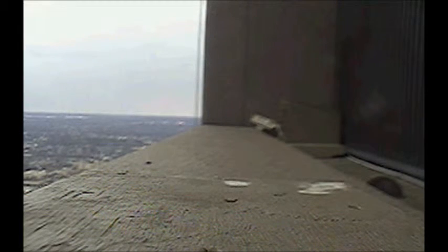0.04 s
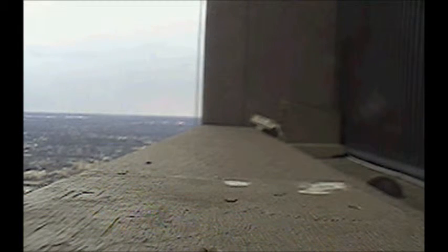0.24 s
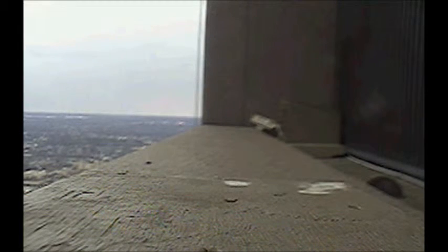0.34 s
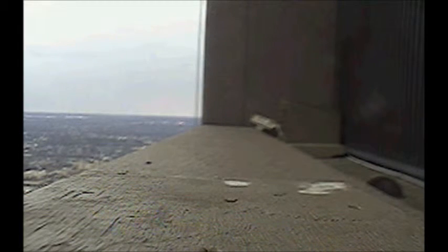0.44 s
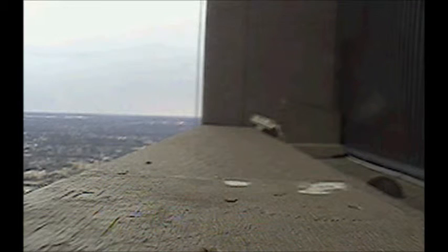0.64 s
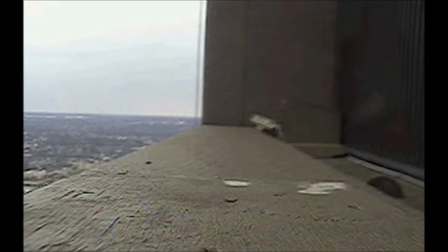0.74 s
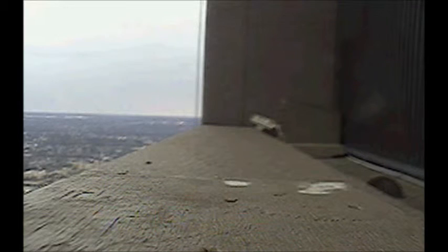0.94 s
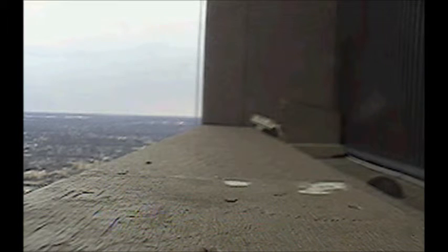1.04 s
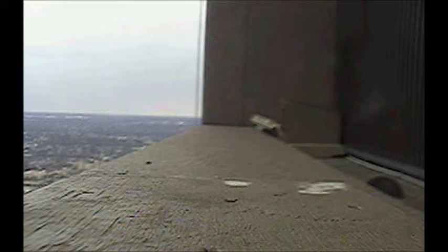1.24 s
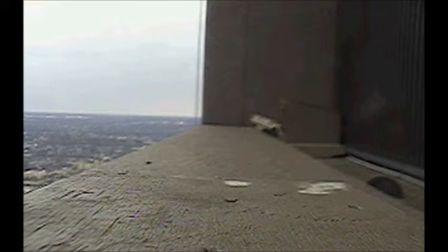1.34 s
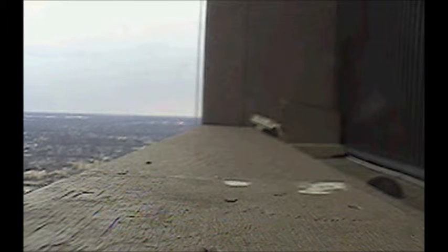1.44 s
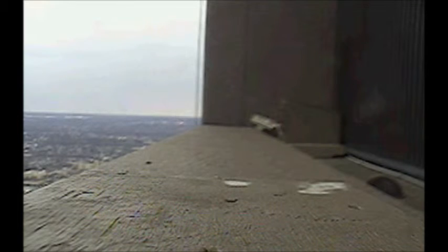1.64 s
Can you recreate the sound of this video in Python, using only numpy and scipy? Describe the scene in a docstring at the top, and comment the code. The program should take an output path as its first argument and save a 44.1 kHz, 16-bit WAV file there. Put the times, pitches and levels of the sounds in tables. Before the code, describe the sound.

A falcon gives three harsh, loud calls close by over low city rumble.

```python
"""Over city rumble and drone, a far falcon yelps. At 0.2 s a near falcon on a stone ledge calls, loud enough
to clip: a rising whistle of the syrinx breaks into a falling, period-doubled rasp. Far yelps follow, then
a second such call at 0.7 s, more yelps and two thin cheeps. At 1.2 s the near bird croaks, slow pulses
ringing its throat, and runs into a short whistle. Two faint cheeps end the scene."""
import sys
import numpy as np
from scipy import signal
from scipy.fft import rfft, irfft, next_fast_len
from scipy.io import wavfile
from scipy.ndimage import map_coordinates

SR = 44100
rng = np.random.default_rng(int(sys.argv[2]) if len(sys.argv) > 2 else 0)


def put_to_file(sound):
    """Save the sound as 16-bit audio at rate SR, in the file named by the first command-line argument."""
    columns = np.atleast_2d(sound).T  # one column per channel
    safe = np.clip(columns, -1, 1)
    whole_steps = np.round(safe * 32767)
    wavfile.write(sys.argv[1], SR, whole_steps.astype(np.int16))


N = 74970
T = np.arange(N) / SR

# Each row: multiple of the whistle's pitch, relative level in dB.
WHISTLE_OVERTONES = [(2, -24), (3, -43)]
# Throat response for the broken voice and for the rasp. Each row: frequency in Hz, gain in dB.
BROKEN_COLOUR = [(500, -3), (950, -20.5), (1300, -11.5), (1750, -9), (2200, -4), (2700, -1), (2980, -1.5),
                 (3170, -10.5), (3550, -9), (4050, -13.5), (4500, -19), (5000, -14.5), (5400, -21.5),
                 (5800, -10.5), (6400, -33), (7800, -25), (12000, -47.5)]
RASP_COLOUR = [(150, -11), (400, -11.5), (900, -2.5), (1200, -5), (1600, -2), (2300, 2.5), (2700, 0),
               (3150, -8), (3550, -1.5), (4400, -15.5), (5000, -17), (8000, -24), (12000, -29)]
WHISTLE_JITTER, BROKEN_JITTER, JITTER_RATE_HZ, FLUTTER_DB = 0.0097, 0.026, 700, 1.97
RASP_PULSE_HZ, RASP_DEPTH = 330.4, 0.52


def syrinx(t, pitch_hz, whistle_db, broken_db, rasp_db):
    """A whistle that grows unsteady as it breaks into a stack on half its pitch, plus pulsing rasp."""
    broken_share = amp(broken_db) / (amp(broken_db) + amp(whistle_db))
    jitter = (WHISTLE_JITTER + BROKEN_JITTER * broken_share) * wobble(JITTER_RATE_HZ, t)
    phase = running_phase(pitch_hz * (1 + jitter))
    overtones = sum(amp(db + 6.6 * wobble(200, t)) * np.sin(k * phase) for k, db in WHISTLE_OVERTONES)
    stack = np.zeros(len(t))
    for k in (1, *range(3, 14)):  # the whistle fills k = 2
        partial_db = along(BROKEN_COLOUR, k * pitch_hz / 2) + 4.28 * wobble(250, t)
        stack += amp(partial_db) * np.sin(k * phase / 2 + rng.uniform(0, 2 * np.pi))
    pulse_hz = RASP_PULSE_HZ * (1 + 0.243 * wobble(200, t))
    pulsing = 1 + RASP_DEPTH * np.cos(running_phase(pulse_hz))
    rasp = unit(resonate(pulsing ** 2 * hiss(t), RASP_COLOUR))
    whistle = np.sqrt(2) * amp(whistle_db + FLUTTER_DB * wobble(300, t)) * (np.sin(phase) + overtones)
    return whistle + amp(broken_db) * stack + amp(rasp_db) * rasp


# Near calls. Each row: time in seconds, pitch in Hz, then whistle, broken voice and rasp levels in dB.
CALL_1 = [(.224, 1964, -26, -48, -29), (.233, 2065, -15, -50.5, -31), (0.248, 2202, -12, -35, -34.5),
          (0.262, 2302, -8.5, -30, -13.5), (.271, 1953, -6, -5.5, -29), (.28, 1753, -10.5, -3.5, -15.5),
          (0.293, 1659, -4.5, -6, -8.5), (0.297, 1683, -24, -19.5, -12), (0.308, 1709, -23, -21.5, -15.5),
          (0.337, 1660, -61, -39, -34)]
CALL_2 = [(0.712, 1997, -30, -56, -37), (0.722, 2110, -12.5, -49, -27.5), (0.736, 2243, -13.5, -31, -26),
          (0.75, 2199, -4.5, -16.5, -20.5), (0.755, 1993, -5.5, -4, -26.5), (.764, 1896, -21, -6, -10),
          (.772, 1632, -8.5, -23, -10.5), (0.778, 1400, -14.5, -16.5, -14.5),
          (0.786, 1386, -20, -24.5, -13), (0.812, 1420, -37, -36.5, -30)]
CALL_3 = [(1.24, 2150, -63, -39, -32), (1.251, 2154, -24, -21, -21), (1.261, 2093, -10.5, -29, -19.5),
          (1.274, 2020, -11.5, -25, -17.5), (1.283, 1960, -22, -38.5, -28),
          (1.317, 1934, -52.5, -44.5, -41)]
# Each row: one call's low edge in Hz, top edge in Hz.
CALL_BANDS = [(253, 15000), (200, 9300), (1700, 5600)]


def near_calls():
    """Three harsh calls of the syrinx, each in its own band."""
    out = np.zeros(N)
    for rows, (low_hz, top_hz) in zip((CALL_1, CALL_2, CALL_3), CALL_BANDS):
        t = between(rows[0][0], rows[-1][0])
        note = syrinx(t, *curves(rows, t))
        note = filtered(note, lambda hz: 1 / np.sqrt(1 + (low_hz / (hz + 1)) ** 10))
        out += placed(t, lowpass(note, top_hz))
    return out


# Each row: time in seconds, pulse rate in Hz, level in dB.
CROAK = [(1.2206, 313.7, -26.5), (1.227, 309.5, -11.5), (1.234, 296.2, -9), (1.248, 302, -14.5),
         (1.257, 302, -32)]
# Throat resonances. Each row: frequency in Hz, decay time in seconds, relative gain.
CROAK_RINGS = [(1780, 0.0025, 0.42), (2110, 0.0021, 0.22), (2644, 0.0017, 0.71)]
# Throat response. Each row: frequency in Hz, gain in dB.
CROAK_COLOUR = [(120, -37), (300, 1.5), (620, -5), (900, -6), (1200, -6), (1500, -2), (1800, -4),
                (2200, -2), (2700, -7.5), (3050, -16.5), (3800, -13.5), (4500, -36), (8500, -43.5),
                (10000, -70)]
PUFF_GAIN = 0.3


def croak():
    """Slow pulses of the syrinx, each with a puff of noise, ring the throat."""
    t = between(CROAK[0][0], CROAK[-1][0])
    rate_hz, level_db = curves(CROAK, t)
    cycles = running_phase(rate_hz) / (2 * np.pi) + 0.5
    pulses = -np.diff(np.floor(cycles), prepend=0) * np.sqrt(SR / rate_hz)
    in_cycle = cycles % 1
    age_s = in_cycle / rate_hz
    rings = sum(gain * np.exp(-age_s / decay_s) * np.sin(2 * np.pi * hz * age_s)
                for hz, decay_s, gain in CROAK_RINGS)
    puffs = unit(np.exp(-2 * in_cycle) * hiss(t))
    source = pulses + rings * np.sin(np.pi * in_cycle) + PUFF_GAIN * puffs
    return placed(t, amp(level_db) * unit(resonate(source, CROAK_COLOUR)))


# Each row: centre in Hz, width in Hz.
NOTCHES = [(2375, 72), (3160, 110)]


def notched(x):
    """Narrow dips in the spectrum of the near calls."""
    def response(hz):
        return np.prod([(centre ** 2 - hz ** 2) / (centre ** 2 - hz ** 2 + 1j * hz * width)
                        for centre, width in NOTCHES], axis=0)
    return filtered(x, response)


# Each row: start in seconds, length in seconds, first pitch in Hz, last pitch in Hz, gain in dB.
YELPS = [(-.01, 0.026, 2265, 2096, -29.5), (0.017, .03, 2000, 1727, -25), (.044, 0.033, 2048, 1835, -31.5),
         (.07, 0.058, 1966, 1587, -37.5), (0.473, 0.036, 2006, 1840, -32), (0.504, .03, 2050, 1730, -29.5),
         (0.543, 0.031, 2427, 2263, -28.5), (0.977, 0.021, 2453, 2334, -34),
         (1.005, 0.019, 2366, 2187, -30.5)]


def yelps():
    """Short falling, broken notes of a bird farther off."""
    out = np.zeros(N)
    for start_s, length_s, first_hz, last_hz, db in YELPS:
        t = between(start_s, start_s + length_s)
        progress = (t - start_s) / length_s
        pitch_hz = first_hz + (last_hz - first_hz) * progress
        note = syrinx(t, pitch_hz, whistle_db=-5, broken_db=-4, rasp_db=-3)
        out += placed(t, lowpass(amp(db) * swell(progress) * note, top_hz=4900))
    return out


# Each row: start in seconds, length in seconds, gain in dB.
CHEEPS = [(1.036, .068, -45), (1.109, .068, -46.5), (1.503, 0.073, -43), (1.57, 0.051, -47.5)]
# Each row: fraction of the cheep's length, pitch in Hz.
CHEEP_ARCH = [(0, 1980), (.25, 2100), (.55, 2100), (.8, 1910), (1, 1740)]
# Each row: multiple of the pitch, relative level in dB.
CHEEP_PARTIALS = [(1, 6), (2, -6.5), (3, -15)]


def cheeps():
    """Far falcons give faint arched whistles in pairs."""
    out = np.zeros(N)
    for start_s, length_s, db in CHEEPS:
        t = between(start_s, start_s + length_s)
        progress = (t - start_s) / length_s
        pitch_hz, = curves(CHEEP_ARCH, progress)
        phase = running_phase(pitch_hz * (1 + 0.0054 * wobble(440, t)))
        tone = sum(amp(level + 3 * wobble(130, t)) * np.sin(k * phase) for k, level in CHEEP_PARTIALS)
        out += placed(t, amp(db) * swell(progress) * tone)
    return out


# Each row: delay in seconds, gain in dB.
WALL_ECHOES = [(.0017, -16), (.0042, -12.5), (.0093, -12)]


def walls(x):
    """The direct sound and its first echoes off the sill and side walls."""
    echoes = sum(amp(db) * np.interp(T - delay_s, T, x, left=0) for delay_s, db in WALL_ECHOES)
    return (x + echoes) / np.sqrt(1 + sum(amp(db) ** 2 for _, db in WALL_ECHOES))


# Each row: frequency in Hz, time to fall 60 dB in seconds.
LEDGE_T60 = [(200, 0.24), (2000, 0.23), (5000, 0.32), (10000, 0.3)]


def ledge(x):
    """The stone recess answers with a short tail."""
    hz, t, spectra = signal.stft(rng.standard_normal(SR // 2), SR, nperseg=256)
    decay = amp(-60 * t / along(LEDGE_T60, hz)[:, None])
    _, tail = signal.istft(spectra * decay, SR, nperseg=256)
    return signal.fftconvolve(x, tail / np.linalg.norm(tail))[:N]


# Traffic spectrum. Each row: frequency in Hz, relative density in dB.
RUMBLE_COLOUR = [(25, -48), (75, -39.5), (105, -9), (165, -11.5), (205, -9), (250, -0.5), (295, 0.5),
                 (355, -2), (410, -15), (470, -23.5), (570, -21.5), (640, -13.5), (690, -16), (750, -8.5),
                 (830, -22), (1030, -24), (1190, -20), (1550, -27), (2100, -30.5), (2800, -37.5),
                 (4200, -46), (5200, -55), (7200, -61), (9500, -58.5), (10500, -88.5)]
# Each row: time in seconds, pitch in Hz, level in dB.
ENGINE_DRONE = [(0, 107.6, -50), (.2, 112.5, -31), (.34, 113.9, -25.5), (.48, 117.6, -29),
                (.64, 127.5, -27), (.8, 121.1, -52.5), (1.0, 120.2, -54.5), (1.15, 121.3, -33.5),
                (1.33, 115.1, -31), (1.44, 109.3, -48), (1.53, 111.7, -28), (1.58, 114.3, -56),
                (1.63, 112.4, -39), (1.7, 114, -50)]
RUMBLE_DB = -23


def city():
    """Traffic rumble with a low engine drone that comes and goes."""
    rumble = unit(filtered(rng.standard_normal(N), lambda hz: amp(along(RUMBLE_COLOUR, hz))))
    drone_hz, drone_db = curves(ENGINE_DRONE, T)
    drone = np.sqrt(2) * np.sin(running_phase(drone_hz * (1 + 0.012 * wobble(25, T))))
    rumble *= amp(RUMBLE_DB + 2.08 * wobble(8.22, T))
    drone *= amp(drone_db + 0.73 * wobble(20, T))
    return rumble + drone


def amp(db):
    """Decibels to gain."""
    return 10 ** (np.asarray(db) / 20)


def unit(x):
    """Scale to rms 1."""
    return x / np.sqrt(np.mean(x ** 2) + 1e-20)


def along(points, hz):
    """Read (Hz, value) points on a log frequency axis."""
    knots_hz, values = np.transpose(points)
    return np.interp(np.log(hz + 1), np.log(knots_hz + 1), values)


def curves(rows, t):
    """Each column after the time, read at times t."""
    times, *columns = np.transpose(rows)
    return [np.interp(t, times, column) for column in columns]


def wobble(rate_hz, t):
    """A smooth random curve, rate_hz knots a second."""
    return map_coordinates(rng.standard_normal(256), [(t - t[0]) * rate_hz], mode="wrap")


def hiss(t):
    """White noise for one note."""
    return rng.standard_normal(SR // 4)[:len(t)]


def swell(progress):
    """A rounded rise and fall over progress 0 to 1."""
    return np.sqrt(np.abs(np.sin(np.pi * progress)))


def running_phase(hz):
    """Phase in radians of a frequency curve."""
    return 2 * np.pi * np.cumsum(hz) / SR


def filtered(x, response):
    """Apply a response given as a function of Hz."""
    size = next_fast_len(len(x) + 4096)
    return irfft(rfft(x, size) * response(np.fft.rfftfreq(size, 1 / SR)), size)[:len(x)]


def lowpass(x, top_hz):
    """Roll off the treble above top_hz."""
    return filtered(x, lambda hz: 1 / np.sqrt(1 + (hz / top_hz) ** 10))


def resonate(x, colour):
    """Apply a minimum-phase filter through (Hz, dB) points."""
    size = 16384
    cepstrum = irfft(np.log(amp(along(colour, np.fft.rfftfreq(size, 1 / SR)))))
    cepstrum[1:size // 2] *= 2
    cepstrum[size // 2 + 1:] = 0
    return irfft(rfft(x, size) * np.exp(rfft(cepstrum)))[:len(x)]


def between(start_s, end_s):
    """The sample times of one note."""
    return T[(T >= start_s) & (T < end_s)]


def placed(t, note):
    """A note laid into the scene at its times."""
    out = np.zeros(N)
    out[np.rint(t * SR).astype(int)] = note
    return out


NEAR_WET_DB, FAR_WET_DB = -19, -3.5


def scene():
    """Near and far birds in the recess, over the city."""
    near = walls(notched(near_calls()) + croak())
    far = yelps() + cheeps()
    tails = amp(NEAR_WET_DB) * ledge(near) + amp(FAR_WET_DB) * ledge(far)
    return (near + far + tails + city())[None]


PEAK_LIMIT, BAND_LIMIT_HZ = 0.99, 12600


def record(dry):
    """The loudest peaks clip, and the treble stops at 12.6 kHz."""
    clipped = np.clip(dry[0], -PEAK_LIMIT, PEAK_LIMIT)
    return filtered(clipped, lambda hz: hz < BAND_LIMIT_HZ)[None]


dry = scene()
out = record(dry)
put_to_file(out)
```